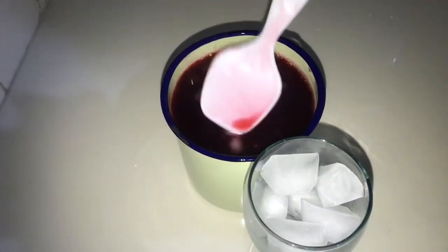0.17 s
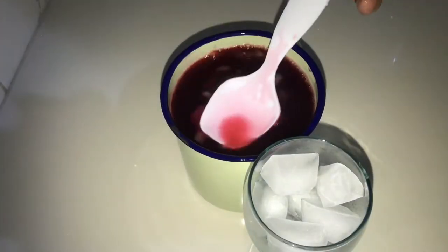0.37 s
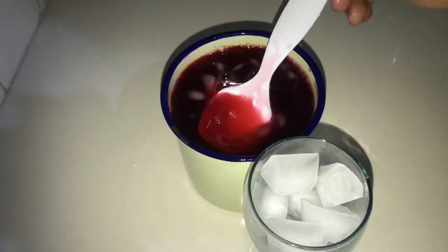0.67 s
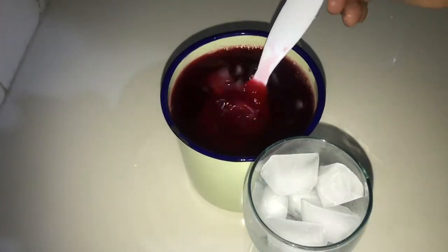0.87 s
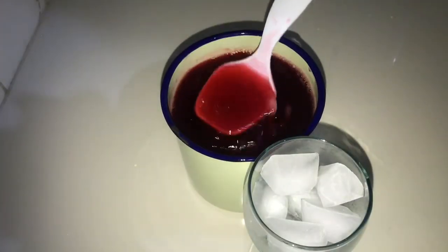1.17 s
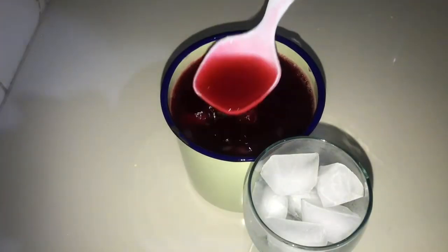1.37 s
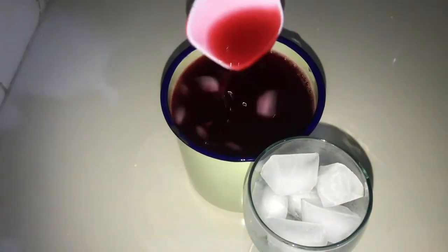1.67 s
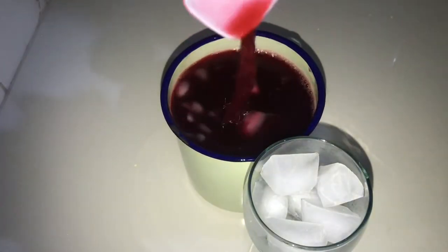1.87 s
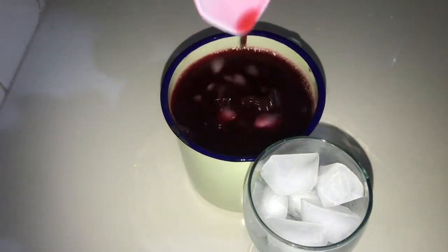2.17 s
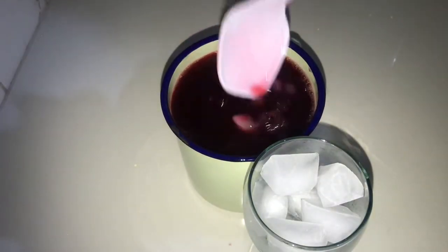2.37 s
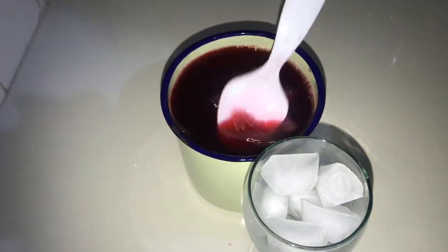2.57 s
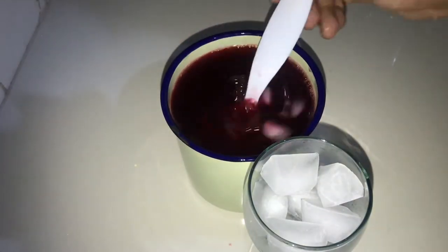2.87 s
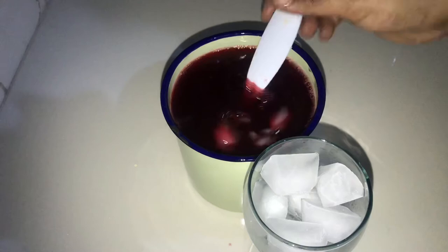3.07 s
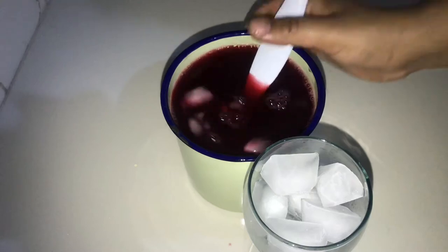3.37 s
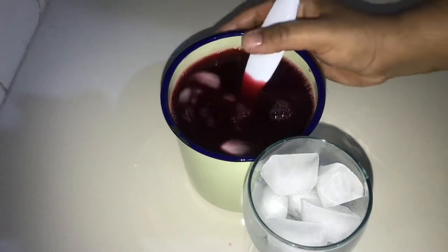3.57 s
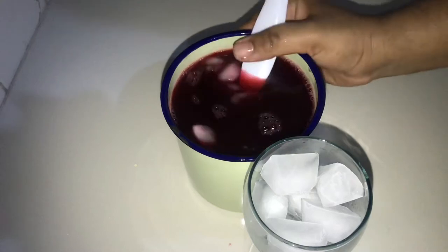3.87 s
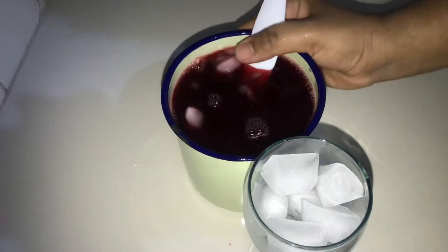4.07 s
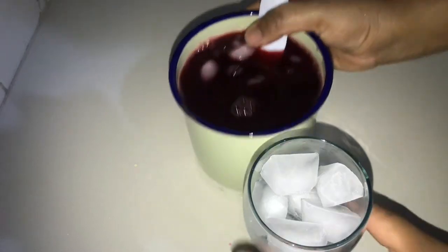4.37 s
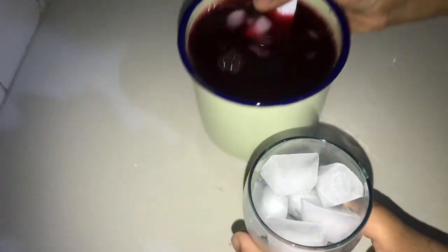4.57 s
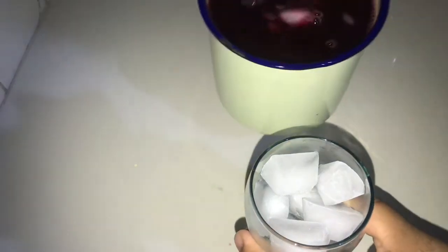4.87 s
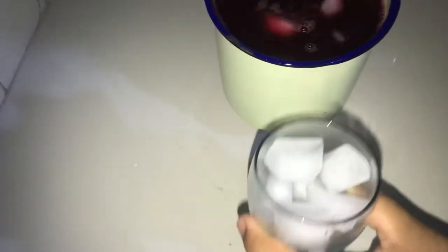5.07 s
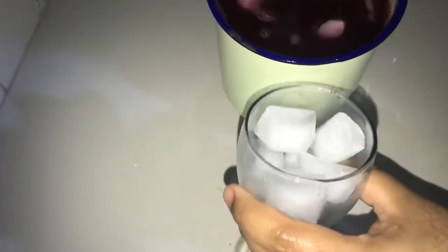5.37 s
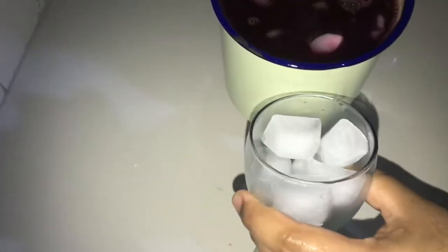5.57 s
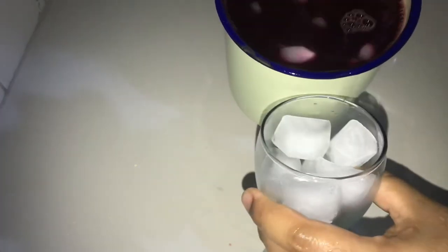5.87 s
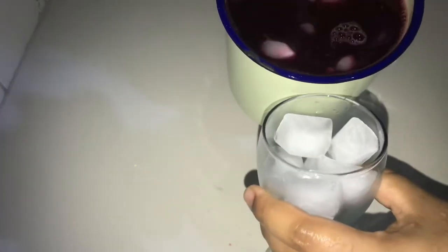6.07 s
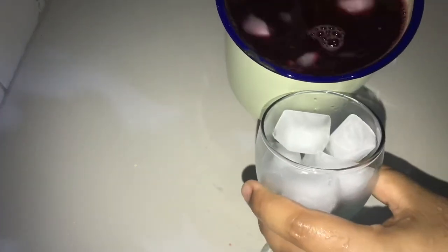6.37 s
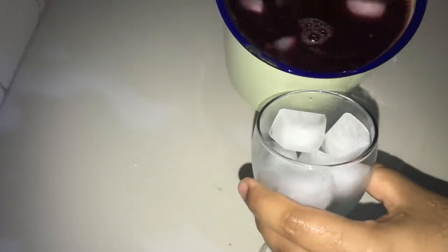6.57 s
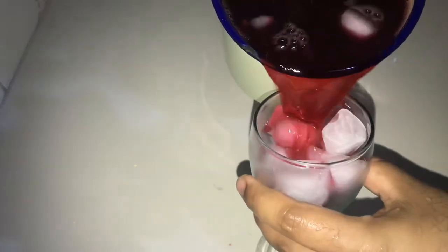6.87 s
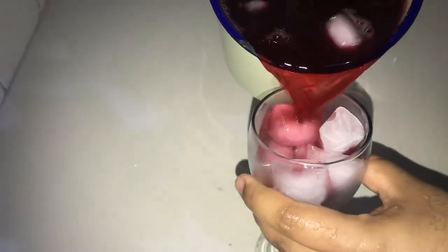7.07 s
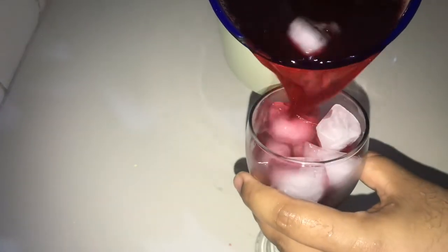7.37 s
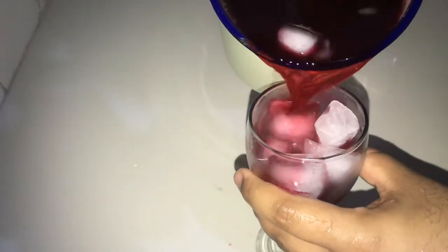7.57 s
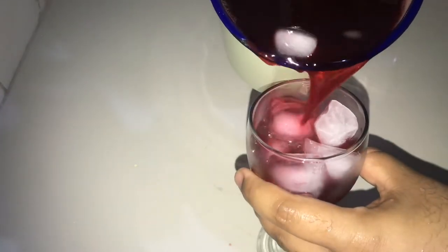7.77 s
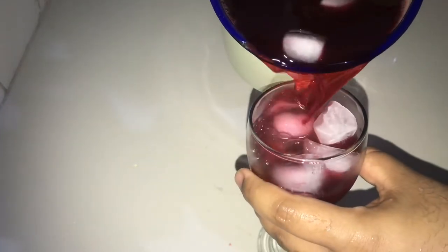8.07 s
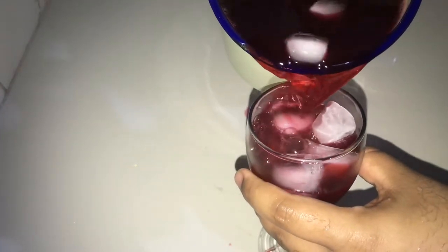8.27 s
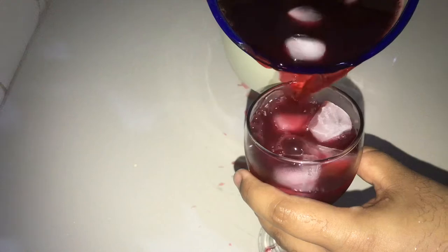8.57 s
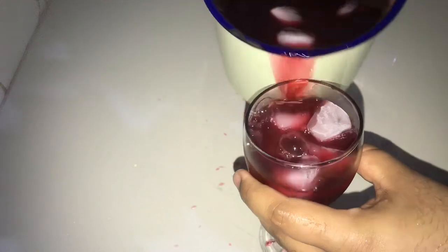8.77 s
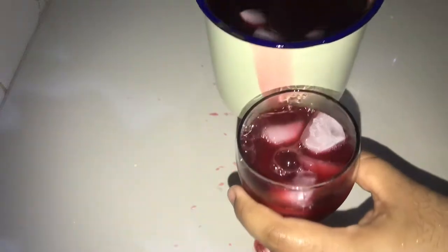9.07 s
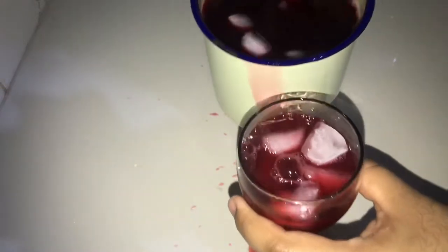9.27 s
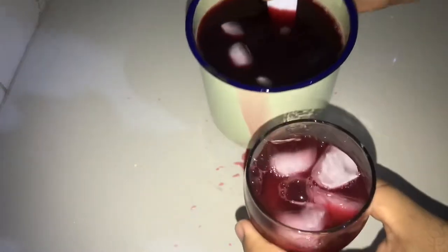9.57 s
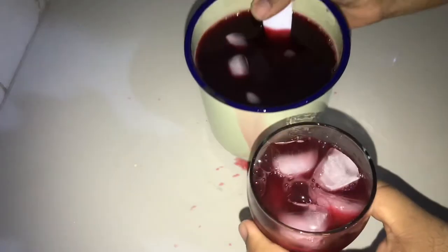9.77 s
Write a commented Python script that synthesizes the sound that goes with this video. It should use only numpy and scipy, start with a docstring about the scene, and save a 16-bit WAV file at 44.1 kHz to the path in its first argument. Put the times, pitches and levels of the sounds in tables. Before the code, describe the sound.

A plastic ladle drips and trickles drink back into an enamel jug, knocks its wall, then liquid pours splashing over ice in a glass.

```python
"""Iced drink in an enamel jug

A plastic ladle stirs, lets liquid run back and knocks on the wall; the jug is tipped over iced glass.
Liquid is chirping bubbles and noise bursts; ladle and ice are noise cracks with decaying wall modes.
Filtered noise and a hum lie behind; a decaying noise tail makes the hard-walled kitchen.
"""
import sys
import numpy as np
from scipy import signal
from scipy.fft import rfft, irfft
from scipy.io import wavfile

SR = 44100
rng = np.random.default_rng(int(sys.argv[2]) if len(sys.argv) > 2 else 0)


def waveform_to_disk(signal):
    """Save audio, clipped to [-1, 1], as 16-bit WAV at the path in sys.argv[1]."""
    frames = np.transpose(np.atleast_2d(signal))
    scaled = np.clip(frames, -1, 1) * 32767
    samples = np.round(scaled).astype(np.int16)
    wavfile.write(sys.argv[1], SR, samples)


N = 437472


def from_db(db):
    """Gain of a level in dB."""
    return 10 ** (np.asarray(db) / 20)


def rms_one(x):
    """Scale to rms 1."""
    return x / np.sqrt(np.mean(x ** 2) + 1e-20)


def add(out, start_s, sound):
    """Mix a short sound in at a time."""
    at = round(start_s * SR)
    out[at:at + len(sound)] += sound[:N - at]


def fade(t60_s, length_s=0.12):
    """Time axis and exponential decay."""
    t = np.arange(round(length_s * SR)) / SR
    return t, from_db(-60 * t / t60_s)


def resonance(x, hz, width_hz):
    """Two-pole band-pass, gain 1 on top."""
    r = np.exp(-np.pi * width_hz / SR)
    feedback = [1, -2 * r * np.cos(2 * np.pi * hz / SR), r * r]
    return signal.lfilter([(1 - r * r) / 2, 0, (r * r - 1) / 2], feedback, x)


def narrow_noise(first_hz, last_hz, width_hz, count):
    """A gliding tone whose size and phase wander at the rate of its width; rms 1."""
    r = np.exp(-np.pi * width_hz / SR)
    wander = signal.lfilter([1], [1, -2 * r, r * r], rng.standard_normal(size=(2, count)))
    phase = 2 * np.pi * np.cumsum(np.linspace(first_hz, last_hz, count)) / SR
    return rms_one(wander[0] * np.sin(phase) + wander[1] * np.cos(phase))


def level_curve(rows, t):
    """Gain over time from rows of seconds and dB."""
    return from_db(np.interp(t, *np.transpose(rows)))


def burst(t60_s, hz, width_hz):
    """Quickly swelling, dying noise twice through a broad resonance; peak 1."""
    t, decay = fade(t60_s, length_s=2 * t60_s)
    noise = rng.standard_normal(len(t)) * decay * np.minimum(t / 0.00061, 1)
    noise = resonance(resonance(noise, hz, width_hz), hz, width_hz)
    return noise / np.abs(noise).max()


CHATTER_DB, CHATTER_PER_S = 5, 90  # swing of the level and its speed


def chatter(sound):
    """A loose contact presses unevenly: a smooth decay breaks into lumps; the onset stays."""
    steps = rng.standard_normal(int(len(sound) * CHATTER_PER_S / SR) + 2)
    steps[0] = 1
    position = np.arange(len(sound)) * CHATTER_PER_S / SR
    swing = np.interp(position, np.arange(len(steps)), steps)
    return sound * from_db(CHATTER_DB * (swing - 1))


def struck(times_s, levels_db, modes, spread_db):
    """Decaying sine modes; every blow strikes each one with a strength of its own."""
    out = np.zeros(N)
    t, _ = fade(1, length_s=0.65)
    hz, db, t60_s = np.transpose(modes)[:, :, None]
    rings = np.sin(2 * np.pi * hz * t) * from_db(db - 60 * t / t60_s)
    luck = rng.standard_normal(size=(len(times_s), len(modes)))
    for start_s, level_db, own in zip(times_s, levels_db, luck):
        add(out, start_s, from_db(level_db + spread_db * own) @ rings)
    return out


def bubble(hz, cycles, rise, swell_s, length_s=0.12):
    """A trapped bubble rings for some cycles (60 dB); positive rise lifts its pitch near the surface."""
    t, decay = fade(cycles / hz, length_s)
    return np.sin(2 * np.pi * hz * (t + rise * hz * t ** 2)) * decay * np.minimum(t / swell_s, 1)


def swarm(count, level_db, low_hz, span, cycles, spread_db):
    """Random bubbles, each with its own time, pitch, glide and size; level_db gives the level at a time."""
    out = np.zeros(N)
    for when, height, glide, luck in rng.random(size=(count, 4)):
        start_s = when * N / SR
        floor_db = level_db(start_s)
        if floor_db > -99:
            size_db = floor_db - spread_db * max(np.log(luck), -3)
            rise = 0.009 * glide - 0.001
            sound = bubble(low_hz * span ** height, cycles, rise, 0.0012, length_s=0.04)
            add(out, start_s, from_db(size_db) * sound)
    return out


# Spectrum of air and hiss. Each row: pitch in Hz, relative density in dB per Hz.
AIR_SPECTRUM = [(20, -20.5), (48, -18.5), (63, -9), (85, -3.5), (167, -17), (483, -27.5), (634, -25.5),
                (3150, -36.5), (7920, -38.5), (10500, -40), (14800, -36.5), (16500, -32.5)]
AIR_DB = -58


def air():
    """Room air and hiss: noise shaped by a spectrum."""
    hz = np.fft.rfftfreq(N, 1 / SR) + 1
    table_hz, table_db = np.transpose(AIR_SPECTRUM)
    colour = from_db(np.interp(np.log(hz), np.log(table_hz), table_db))
    noise = irfft(rfft(rng.standard_normal(N)) * colour, N)
    return from_db(AIR_DB) * rms_one(noise)


# Faint high whines. Each row: first pitch in Hz, last pitch in Hz, width in Hz, level in dB.
WHINE_BANDS = [(13300, 13300, 160, -84), (14550, 15150, 100, -84)]


def whines():
    """Steady or gliding narrow noise, high in pitch."""
    return sum(from_db(db) * narrow_noise(first_hz, last_hz, width_hz, count=N)
               for first_hz, last_hz, width_hz, db in WHINE_BANDS)


# Low rumble of the house. Each row: time in seconds, level in dB.
RUMBLE_LEVELS = [(1.4, -85), (1.8, -64), (4.2, -66), (4.8, -77)]
RUMBLE_HZ, RUMBLE_WIDTH_HZ = 124.5, 45


def rumble(t):
    """Low rumble: narrow noise along a level curve."""
    noise = narrow_noise(RUMBLE_HZ, RUMBLE_HZ, RUMBLE_WIDTH_HZ, count=N)
    return level_curve(RUMBLE_LEVELS, t) * noise


# Wavering drone. Each row: time in seconds, level in dB.
DRONE_LEVELS = [(0.3, -65.5), (1, -71), (6, -72), (7, -60.5), (7.8, -71.5), (9.9, -68.5)]
DRONE_HZ, DRONE_WIDTH_HZ = 298.2, 42.5


def drone(t):
    """A wavering drone: narrow noise along a level curve."""
    noise = narrow_noise(DRONE_HZ, DRONE_HZ, DRONE_WIDTH_HZ, count=N)
    return level_curve(DRONE_LEVELS, t) * noise


# Appliance hum. Each row: time in seconds, level in dB.
HUM_LEVELS = [(0, -102), (.3, -51.5), (1.3, -53.5), (1.6, -64), (4.9, -70), (5.35, -54), (5.9, -64),
              (7.2, -64), (7.8, -49.5), (8.4, -50), (9.1, -54), (9.3, -74), (9.6, -52.5), (9.92, -57)]
HUM_HZ, HUM_WIDTH_HZ = 82.3, 11


def hum(t):
    """Appliance hum: a sine made unsteady by narrow noise, swelling along a level curve."""
    sine = np.sqrt(2) * np.sin(2 * np.pi * HUM_HZ * t)
    tone = sine + 0.33 * narrow_noise(HUM_HZ, HUM_HZ, HUM_WIDTH_HZ, count=N)
    return level_curve(HUM_LEVELS, t) * tone


def background():
    """Air, hum, rumble, drone and whines together."""
    t = np.arange(N) / SR
    return air() + hum(t) + rumble(t) + drone(t) + whines()


# Thin whistles, like air escaping from ice.
# Each row: start in seconds, end in seconds, pitch in Hz, width in Hz, level in dB.
WHISTLE_EVENTS = [(5.8, 6.08, 3300, 300, -73), (8.67, 8.95, 2500, 100, -74), (8.9, 9.1, 4050, 90, -75),
                  (9.55, 9.95, 2850, 300, -72)]


def whistles():
    """Narrow noise that swells and fades."""
    out = np.zeros(N)
    for start_s, end_s, hz, width_hz, db in WHISTLE_EVENTS:
        swell = np.sin(np.pi * np.arange(0, 1, 1 / SR / (end_s - start_s))) ** 0.22
        noise = narrow_noise(hz, hz, width_hz, count=len(swell))
        add(out, start_s, from_db(db) * swell * noise)
    return out


# Ice on the glass.
# Each row: start in seconds, crack level in dB, crack centre in Hz, ringing in dB against the crack.
ICE_TAPS = [(4.722, -30, 2920, -19), (4.799, -32.5, 2870, -19.5), (6.171, -28, 2640, -12.5),
            (7.147, -22, 3230, -30), (7.484, -24, 2800, -53)]
# Modes of the glass. Each row: pitch in Hz, relative level in dB, t60 in seconds.
GLASS_MODES = [(1551, 3, 0.17), (1872, -4, 0.1), (1943, -4, 0.12), (2524, -4, 0.07), (3256, -8, 0.06),
               (4109, -6, 0.07)]


def clinks():
    """Ice cubes tap the glass as it is moved: a noise crack and ringing modes."""
    start_s, db, centre_hz, ring_db = np.transpose(ICE_TAPS)
    out = struck(start_s, db + ring_db, GLASS_MODES, spread_db=1.5)
    for start, level_db, hz in zip(start_s, db, centre_hz):
        add(out, start, from_db(level_db) * chatter(burst(0.09, hz, 1.28 * hz)))
    return out


# The jug jolts the counter. Each row: start in seconds, level in dB.
COUNTER_JOLTS = [(2.758, -44), (3.087, -54), (3.116, -47), (3.431, -52.5), (4.25, -61)]
# Modes of the counter. Each row: pitch in Hz, relative level in dB, t60 in seconds.
COUNTER_MODES = [(130.3, 9, 0.15), (226, 0, 0.62)]


def thuds():
    """Low counter modes ring under the jug, band-limited."""
    ringing = struck(*np.transpose(COUNTER_JOLTS), COUNTER_MODES, spread_db=1.5)
    return signal.sosfilt(signal.butter(2, [95, 400], "band", fs=SR, output="sos"), ringing)


# Modes of the jug wall. Each row: pitch in Hz, relative level in dB.
JUG_MODES = [(549, -15), (635, -15), (764, -13), (980, -7), (1240, -6), (1555, -10), (1868, -3), (2020, -8),
             (2065, -6), (2270, -5), (2430, -3), (2575, -5), (2767, -4), (2920, -8), (3520, -6), (3670, -6),
             (3830, -8), (4100, -5), (4700, -9), (5090, -6), (5440, -7), (5880, -8), (6400, -5), (7940, -6)]
JUG_T60_S, JUG_DAMPING = 0.42, 0.7  # t60 at 1 kHz; it shortens as pitch to this power
MODE_TILT_DB = 7  # loss per octave away from the crack


def jug_ringing(ring_db, centre_hz):
    """The wall rings freely, strongest in the modes near the crack."""
    modes = []
    for hz, db in JUG_MODES:
        tilted_db = db - MODE_TILT_DB * abs(np.log2(hz / centre_hz))
        modes.append((hz, tilted_db, JUG_T60_S * (1000 / hz) ** JUG_DAMPING))
    return struck([0], [ring_db], modes, spread_db=2)[:SR]


RATTLE_WIDTH_HZ, RATTLE_SPREAD_DB = 78, 4  # modes damped by the touching ladle; unevenness between blows
CRACK_TOP_DB, BARE_CRACK_DB = -5, -5  # bright edge of the crack; the crack outside the modes


def crack_and_rattle(t60_s, centre_hz, luck):
    """A broad uneven crack, heard bare and through the damped modes of the jug."""
    bright = from_db(CRACK_TOP_DB) * burst(t60_s, 8000, 31000)
    crack = chatter(burst(t60_s, centre_hz, centre_hz) + bright)
    rattle = sum(from_db(db + RATTLE_SPREAD_DB * own) * resonance(crack, hz, RATTLE_WIDTH_HZ)
                 for (hz, db), own in zip(JUG_MODES, luck))
    return rattle / np.abs(rattle).max() + from_db(BARE_CRACK_DB) * crack


# Ladle and ice against the jug.
# Each row: start in seconds, crack level in dB, crack centre in Hz, wall ringing in dB.
JUG_BLOWS = [(0.286, -24, 3100, -54), (0.7912, -30.5, 2240, -63), (0.869, -40, 2600, -74),
             (0.887, -35.5, 4300, -66), (1.0046, -34.5, 3120, -56.5), (1.1913, -47, 2800, -56.5),
             (1.2539, -34, 6040, -51), (2.546, -24, 4870, -65), (2.566, -22, 2400, -65),
             (2.579, -22, 2090, -72), (2.753, -20, 1610, -30), (3.088, -22.5, 2980, -42),
             (3.117, -22.5, 2660, -39), (3.146, -20, 2820, -32.5), (3.434, -41, 2030, -51.5),
             (3.78, -45.5, 2760, -63), (3.816, -41, 3520, -48.5), (3.835, -27, 3220, -52),
             (3.873, -29.5, 2520, -72), (3.938, -38.5, 5140, -82), (4.071, -41, 4900, -62),
             (4.266, -43.5, 3360, -58.5), (4.352, -39, 1850, -63), (4.432, -39.5, 3730, -72.5),
             (4.591, -45.5, 3200, -74), (4.894, -36.5, 3400, -64), (5.053, -49, 1720, -82)]
RATTLE_S, RATTLE_DOUBLES_DB = 0.037, -47.5  # shortest t60; wall ringing at which it doubles
TICK_DB = -3  # first sharp tick against the crack level
WASH_DB, WASH_T60_S, WASH_HZ = 10.5, 0.35, 2760  # slosh level against the wall ringing
BOUNCE_S, BOUNCE_DB = 0.19, -23  # bounces fall within this time; level against the crack level
KNOCK_LOW_CUT_HZ = 480  # the small wall radiates little bass


def knocks():
    """A tick, a rattling crack, free ringing, a slosh and two small bounces; thuds in the counter."""
    out = np.zeros(N)
    lucks = rng.standard_normal(size=(len(JUG_BLOWS), len(JUG_MODES)))
    for (start_s, db, hz, ring_db), luck in zip(JUG_BLOWS, lucks):
        t60_s = RATTLE_S * (1 + from_db(ring_db - RATTLE_DOUBLES_DB))
        add(out, start_s, jug_ringing(ring_db, hz))
        add(out, start_s, from_db(db) * crack_and_rattle(t60_s, hz, luck))
        slosh = chatter(burst(WASH_T60_S, WASH_HZ, 2 * WASH_HZ))
        add(out, start_s, from_db(ring_db + WASH_DB) * slosh)
        for when, height in rng.random(size=(2, 2)):
            bounce = burst(RATTLE_S / 2, hz * (1 + height), hz / 2)
            add(out, start_s + BOUNCE_S * when, from_db(db + BOUNCE_DB) * bounce)
        add(out, start_s, from_db(db + TICK_DB) * burst(0.001, hz, 2.3 * hz))
    low_cut = signal.butter(3, KNOCK_LOW_CUT_HZ, "high", fs=SR, output="sos")
    return signal.sosfilt(low_cut, out) + thuds()


# Running or sloshing liquid, one list per stretch.
# Each row: time in seconds, level in dB of the smallest bubbles.
STREAM_LEVELS = [
    [(.25, -68.5), (.5, -63), (.72, -75), (1.2, -103), (1.45, -72), (1.7, -67), (2.05, -54.5), (2.3, -88)],
    [(6.82, -77), (7.0, -62.5), (7.55, -57.5), (7.95, -71), (8.1, -71), (8.25, -77)],
]
# Liquid falls from a height. Each row: start in seconds, end in seconds, lowest spit level in dB.
FALL_SPANS = [(1.499, 2.201, -44.5), (6.877, 7.911, -46.5), (8.061, 8.14, -36)]
GURGLE_DB = -2.5  # mid-sized bubbles against the small ones


def flow_db(s):
    """Level of the running liquid at a time; silent outside the stretches."""
    return max(np.interp(s, *np.transpose(rows), left=-200, right=-200) for rows in STREAM_LEVELS)


def stream():
    """Dense small bubbles and gurgle while liquid runs, small bright spits at random while it falls."""
    small = swarm(count=7000, level_db=flow_db, low_hz=1202, span=5.06, cycles=29.6, spread_db=8.0)
    gurgle = swarm(count=2200, level_db=flow_db, low_hz=850, span=4.56, cycles=19.0, spread_db=4.5)
    out = small + from_db(GURGLE_DB) * gurgle
    for start_s, end_s, db in FALL_SPANS:
        spit_count = round(90 * (end_s - start_s))
        for when, height, luck in rng.random(size=(spit_count, 3)):
            hz = 7000 * 2.63 ** height
            spit = from_db(db + 4.5 * luck) * burst(0.025, hz, 0.56 * hz)
            add(out, start_s + when * (end_s - start_s), spit)
    return out


# Bright spits where liquid falls from a height. Each row: start in seconds, level in dB, centre in Hz.
SPIT_EVENTS = [(1.699, -31.5, 12000), (1.733, -20, 11700), (1.8506, -25.5, 14900), (1.9041, -31, 14600),
               (2.0743, -26, 8600), (2.1907, -29.5, 9330), (2.2866, -33.5, 15500), (7.3387, -31.5, 7400),
               (7.7606, -30, 13700), (8.0601, -36, 12800), (8.0731, -30.5, 7500), (8.1, -30, 8630)]


def spits():
    """Short bright noise bursts."""
    out = np.zeros(N)
    for start_s, db, hz in SPIT_EVENTS:
        add(out, start_s, from_db(db) * burst(0.017, hz, 0.52 * hz))
    return out


# Bubbles that close under the surface. Each row: start in seconds, level in dB, pitch in Hz.
LONE_BUBBLES = [(0.003, -37, 1078), (0.286, -30, 1167), (0.559, -46.5, 1040), (1.665, -36, 1364),
                (1.789, -33, 1020), (1.825, -30, 1225), (1.848, -35, 950), (1.951, -24, 856),
                (1.976, -30, 850), (2.09, -36, 1094), (3.008, -37, 5940), (3.306, -31, 6270),
                (6.968, -39.5, 1043), (7.088, -31, 1005), (7.198, -20.5, 1188), (7.309, -39.5, 597),
                (7.351, -30, 1520), (7.532, -35.5, 962), (7.552, -32, 1154), (7.573, -34, 1540),
                (7.785, -36.5, 1080), (7.816, -37, 1550), (7.917, -45.5, 760), (8.033, -45, 2880),
                (8.073, -41.5, 1160)]


def glugs():
    """Lone bubbles, without a splash."""
    out = np.zeros(N)
    for start_s, db, hz in LONE_BUBBLES:
        add(out, start_s, from_db(db) * bubble(hz, 50.0, 0.0035, 0.0022))
    return out


# Clearest drops and small ice ticks. Each row: start in seconds, level in dB, bubble pitch in Hz.
DROP_EVENTS = [(0.0034, -30, 3900), (0.3124, -21, 2910), (0.381, -30, 4050), (0.423, -29, 5040),
               (0.5326, -28.5, 4760), (0.767, -26.5, 5300), (1.0922, -33.5, 5960), (1.556, -36, 2070),
               (1.664, -29, 1940), (1.699, -31, 4070), (1.92, -28, 3640), (1.9602, -19, 3770),
               (1.997, -23.5, 2210), (2.042, -28.5, 3840), (2.09, -29, 2870), (2.107, -31, 3850),
               (2.1615, -29, 3900), (4.638, -45, 3540), (6.89, -28.5, 2430), (6.944, -22, 3740),
               (6.971, -38, 1860), (7.076, -22.5, 2050), (7.1873, -14, 2920), (7.274, -33.5, 1620),
               (7.308, -20, 2580), (7.4187, -23, 3010), (7.467, -34, 3000), (7.5566, -24, 2970),
               (7.5984, -26.5, 3170), (7.662, -41, 1800), (7.702, -22.5, 3650), (7.785, -23.5, 3960),
               (7.805, -27, 3100), (7.877, -35, 3880), (8.0816, -30.5, 3080), (8.1288, -36.5, 1740),
               (8.534, -37.5, 5900), (9.1123, -32, 2800), (9.191, -40, 1770), (9.433, -33.5, 2780)]
# parts against the drop's level; a falling drop is mostly bubble
PLINK_DB, SLAP_DB, FALLING_SLAP_DB, SPRAY_DB = -1, -5, -12, -16.5


def drops():
    """Each drop: a small bubble, a wet slap around its pitch and a little spray."""
    out = np.zeros(N)
    lucks = rng.random(size=len(DROP_EVENTS))
    for (start_s, db, hz), luck in zip(DROP_EVENTS, lucks):
        plink = bubble(hz, 44.0, 0.006 * luck, 0.002, length_s=0.08)
        add(out, start_s, from_db(db + PLINK_DB) * plink)
        falling = any(first_s < start_s < last_s for first_s, last_s, _ in FALL_SPANS)
        slap_db = FALLING_SLAP_DB if falling else SLAP_DB
        add(out, start_s, from_db(db + slap_db) * chatter(burst(0.066, hz, 1.16 * hz)))
        add(out, start_s, from_db(db + SPRAY_DB) * burst(0.0089, 7200, 13000))
    return out


ROOM_T60_S, ROOM_DB, WALL_CUT_HZ = 0.37, -11, 2060  # tail decay, energy against the direct sound, dulling


def kitchen(x):
    """The direct sound, then a diffuse tail dulled by the walls."""
    t, decay = fade(ROOM_T60_S, length_s=0.66)
    dull = np.exp(-2 * np.pi * WALL_CUT_HZ / SR)
    noise = signal.lfilter([1], [1, -dull], rng.standard_normal(len(t)))
    tail = noise * decay * np.minimum(t / 0.0051, 1)
    response = from_db(ROOM_DB) * tail / np.sqrt(np.sum(tail ** 2))
    response[0] = 1
    return signal.fftconvolve(x, response)[:N]


def scene():
    """Near sources in the room, over the whistles and background."""
    liquid = stream() + spits() + glugs() + drops()
    near = kitchen(clinks() + knocks() + liquid)
    return (background() + whistles() + near)[None]


STOP_HZ = 16600  # 60 dB down from here up


def record(dry):
    """A steep low-pass cuts the top."""
    return signal.sosfilt(signal.cheby2(12, 60, STOP_HZ, fs=SR, output="sos"), dry)


dry = scene()
out = record(dry)
waveform_to_disk(out)
```